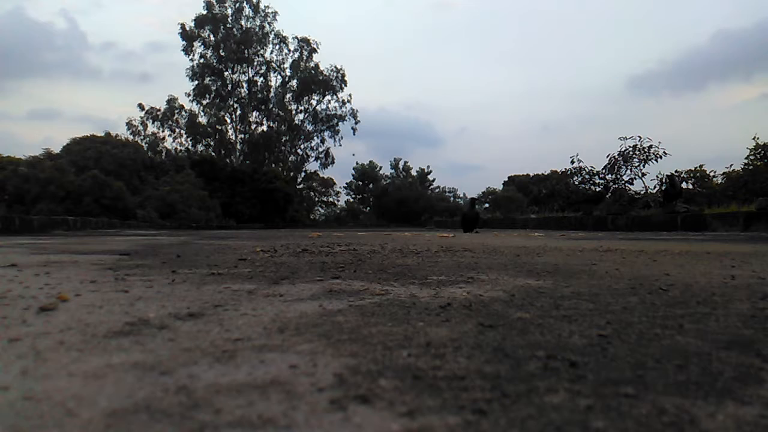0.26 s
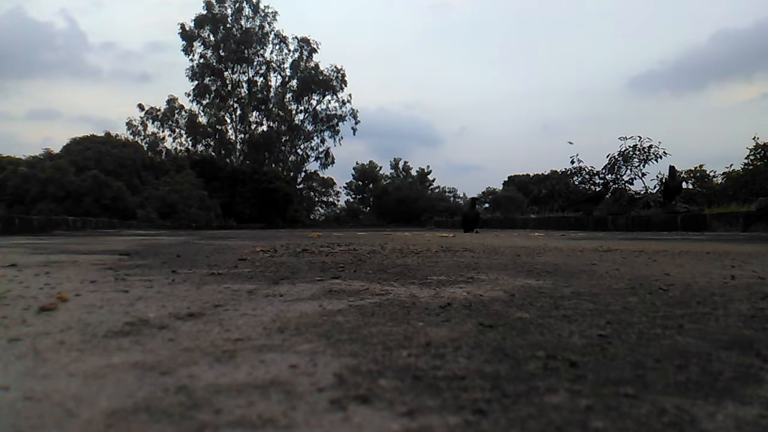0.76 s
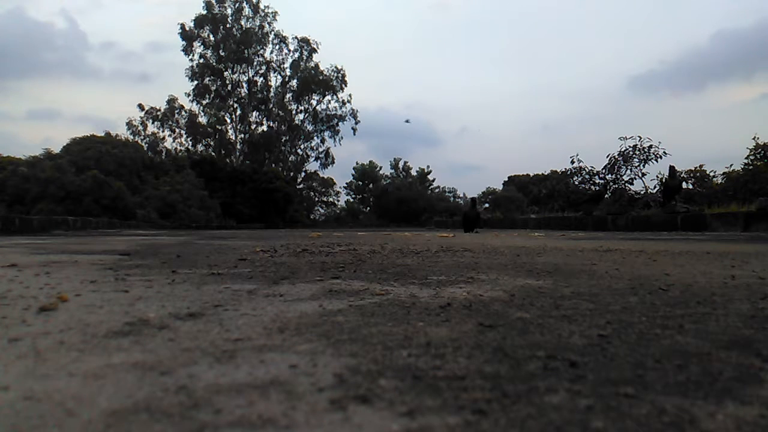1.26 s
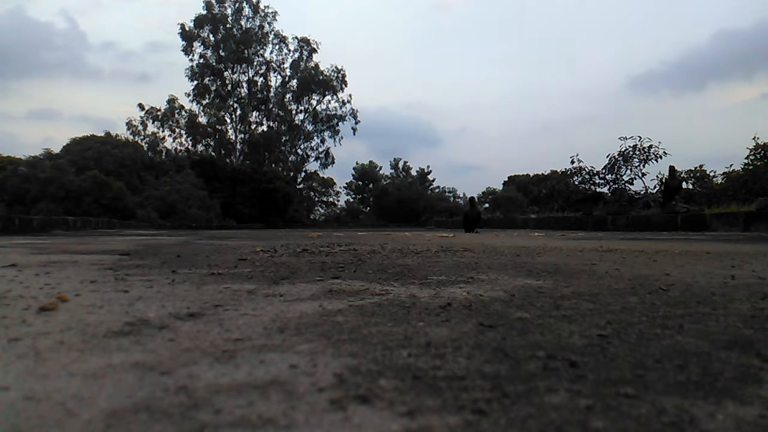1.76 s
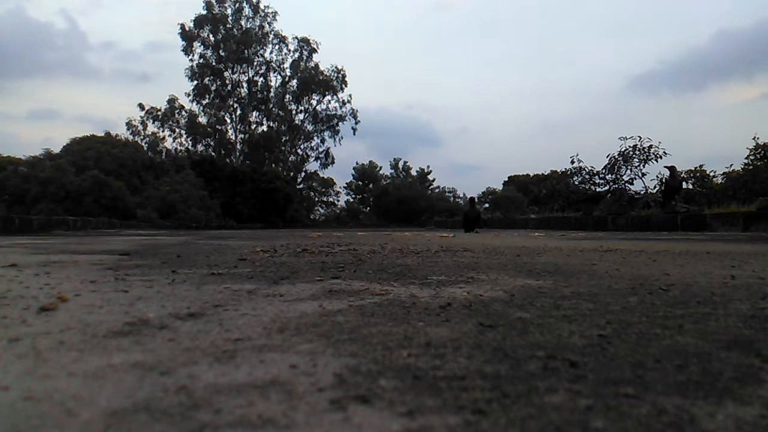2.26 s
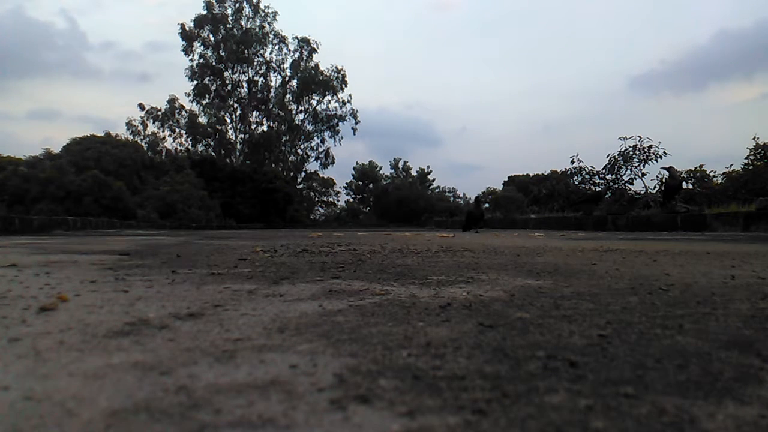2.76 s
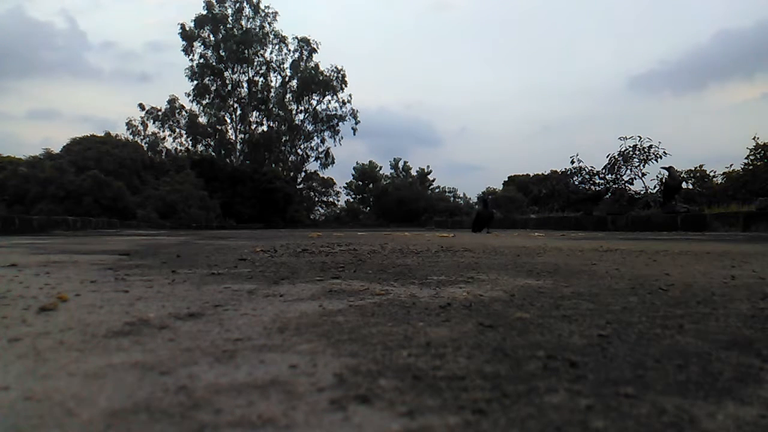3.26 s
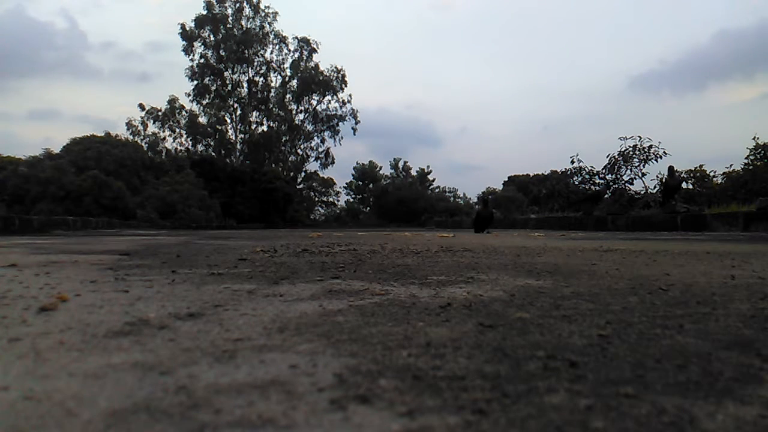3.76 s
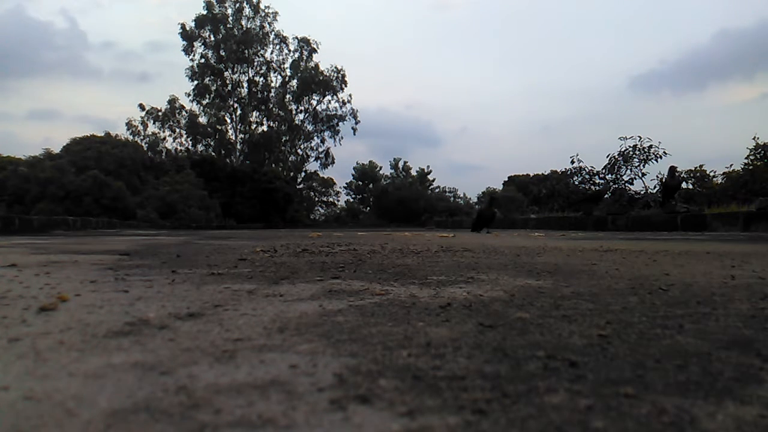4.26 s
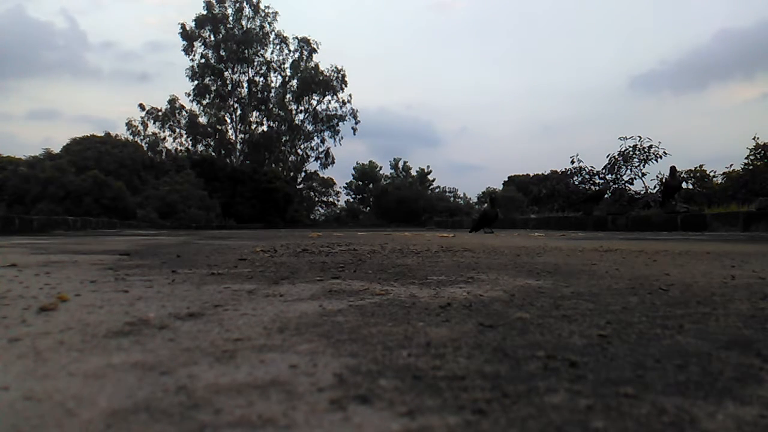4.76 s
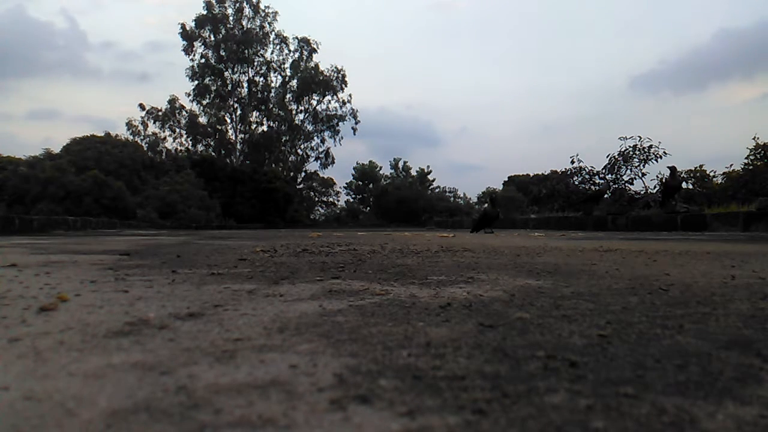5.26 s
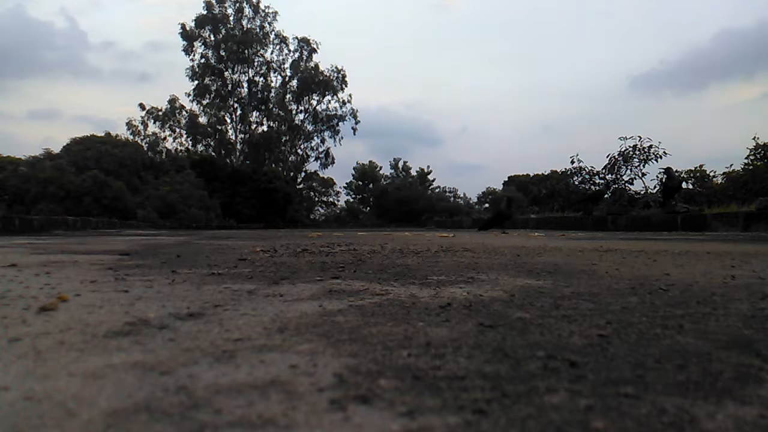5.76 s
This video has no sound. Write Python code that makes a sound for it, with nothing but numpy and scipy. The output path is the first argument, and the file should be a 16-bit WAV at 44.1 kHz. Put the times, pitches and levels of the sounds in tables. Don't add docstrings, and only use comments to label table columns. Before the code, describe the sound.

Loud rasping crow caws, then a sparse lull and more caws from other birds, over faint songbirds, distant flock chatter and breezy outdoor hush.

```python
import sys
import numpy as np
from scipy import signal
from scipy.fft import rfft, irfft, next_fast_len
from scipy.io import wavfile
from scipy.ndimage import uniform_filter1d

SR = 44100
rng = np.random.default_rng(int(sys.argv[2]) if len(sys.argv) > 2 else 0)


def magnitude_from_level(level_db):
    exponent = np.asarray(level_db, float) / 20
    return 10 ** exponent


def log_audio(samples):
    frames = np.atleast_2d(samples).T
    limited = np.clip(frames, -1, 1)
    pcm = np.round(limited * 32767).astype(np.int16)
    wavfile.write(sys.argv[1], SR, pcm)


N = 265041

# (start [s], hold [s], share of the hold where the pitch tops [0-1], top pitch [Hz], level [dB])
CAWS = [(-.245, 0.26, 0.63, 483.6, -12.5), (-.05, 0.22, 0.94, 490.4, -29.5),
        (.449, 0.27404, 0.61, 503.1, -13), (1.121, 0.2573, 0.64, 491.7, -12.5),
        (1.851, 0.31, 0.31, 513.1, -49.5), (3.69, 0.32, 0.48, 467.3, -27.5),
        (4.159, 0.36, 0.61, 508, -61.5), (4.534, 0.25245, 0.43, 453.5, -17.5), (5.3, .42, .38, 451.7, -34),
        (5.689, 0.29, .5, 504.9, -17), (2.299, 0.27, .5, 455.8, -72.5), (3.04, 0.15, .5, 470, -79.5),
        (2.64, 0.17, .5, 495, -76.5)]
CALLERS = [0, 1, 0, 0, 2, 3, 1, 4, 5, 6, 5, 5, 2]
WET_DB = [-30, -10, -6, -13, -28, -11, -24]


def crows():
    direct, by_trees = np.zeros(N), np.zeros(N)
    for (start, *shape), bird in zip(CAWS, CALLERS):
        voice = caw(shape, bird)
        add(direct, start, voice)
        add(by_trees, start, voice * magnitude_from_level(WET_DB[bird]))
    return direct + echo(by_trees, t60_s=0.2, db=0)


SCOOP_DB = [-23.5, -30, -12, -16.5, -20.5, -2, -11]


def caw(shape, bird):
    t, hz, flutter_hz, db = effort(*shape, bird)
    hz = hz * (1 - 0.2 * np.exp(-t / 0.022))
    rising = t < t[db.argmax()]
    shut = np.clip((.9 - hz / hz.max()) / .15, 0, 1)
    plain, beat, phase = folds(t, hz, flutter_hz, db, rising, bird)
    tone = pulse(t, beat, partials(hz, phase, db, rising), bird)
    voice = throat(tone, db, shut, bird)
    steady = voice / np.sqrt(uniform_filter1d(voice ** 2, size=1800) + 0.13 * np.mean(voice ** 2))
    scoop = np.cos(2 * plain) + 1.3 * np.cos(3 * plain)
    scoop = scoop * magnitude_from_level(SCOOP_DB[bird]) * shut * np.where(rising, .2, 1)
    edge = np.clip(np.minimum(t / .003, (t[-1] - t) / .035), 0, 1)
    return (steady + scoop) * magnitude_from_level(db) * edge


# (flutter [Hz], pitch lack at the start [0-1], pitch sag at the end of the hold [0-1],
# swell time [s], fade over the hold [dB])
MANNERS = [(77.79, .25, .12, 0.04766, -5.5), (72.85, 0.5, 0.95, .03, -18), (76.3, 0.9, 0.3, 0.022, -11),
           (70.13, 0.6, 0.3, 0.0511, -14.5), (75.95, 0.1, .15, 0.03283, -4), (83.66, .24, .09, 0.0501, -5),
           (81.96, 0.26, .05, 0.043, -7)]


def effort(held_s, top, top_hz, top_db, bird):
    flutter_hz, lack, sag, swell_s, fade_db = MANNERS[bird]
    release_s = .07
    t = np.arange(0, held_s + release_s + 0.12, 1 / SR)
    u = np.minimum(t / held_s, 1)
    top = min(top, .99)
    before, after = np.maximum(1 - u / top, 0), np.maximum((u - top) / (1 - top), 0)
    arch = 1 - lack * before ** 2 - sag * after ** 2
    cave = 1 - 0.5 / (1 + np.exp((held_s + 0.011 - t) / 0.0082))
    swell_db = -31 * np.exp(-t / swell_s)
    release_db = -12000 * np.maximum(t - held_s, 0) ** 2
    tired = 1 - .08 * u ** 3
    return t, top_hz * arch * cave, flutter_hz * tired, top_db + swell_db + fade_db * u ** 2 + release_db


FLUTTERS = [(0.5945, 0.062, 1.7, 0.18, 1.4), (0.64, 0.043, 1.2, 0.2, 1.5),
            (0.603, 0.1406, 0.79, 0.25, 1.02), (0.66, 0.077, 1.1, 0, 0.34), (0.59, 0.03, 2.6, 0, 0.35),
            (0.46, 0.19, 2.1, 0.16, 1.5), (0.65, 0.14, 1.2, 0.1, 1.15)]
SETTLE_S = [.03, .03, .03, .03, .04, .15, .05]
LOCKED = {4: 6}


def folds(t, hz, flutter_hz, db, rising, bird):
    swing, second, second_phase, _, _ = FLUTTERS[bird]
    jitter = .005 + .004 * np.minimum(db.max() - db, 14) * np.where(rising, 1, .2)
    jitter = jitter + .02 * (t < SETTLE_S[bird])
    beat = 2 * np.pi * np.cumsum(flutter_hz * (1 + jitter * walk(60, size=len(t)))) / SR
    plain = 2 * np.pi * np.cumsum(hz * (1 + jitter * walk(400, size=len(t)))) / SR
    if bird in LOCKED:
        beat = plain / LOCKED[bird]
    phase = plain + swing * np.sin(beat) + second * np.sin(2 * beat + second_phase)
    return plain, beat, phase


def partials(hz, phase, db, rising):
    size = len(hz)
    order = np.arange(1, 34)[:, None]
    upper = order > 6
    even = 2 * np.pi * np.cumsum(hz) / SR
    swung = even + (phase - even) * np.where(upper, .6, 1)
    scatter = 2 * np.pi * np.where(upper, .35, 1) * rng.random((33, 1))
    lines = np.cos(order * swung + scatter)
    for k in range(33):
        lines[k] *= magnitude_from_level((2.8 if k > 5 else 1.6) * walk(45, size=size))
    lines[0] *= magnitude_from_level(-28)
    opening = 1 - .94 * rising * np.clip((db.max() - db - 3) / 14, 0, 1)
    lines[4:6] *= opening
    air = 4 * high_pass(rng.standard_normal(size), 4, 3000)
    breath = .3
    high = np.sqrt(1 - breath) * lines[6:].sum(axis=0) + np.sqrt(breath) * air
    return lines[:6].sum(axis=0) + magnitude_from_level(1.2 * walk(60, size=size)) * np.sqrt(opening) * high


CATCHES = [(0.3, 4.1, 4.3), (.3, 3., 4.6), (0.2, 3., 5.05), (0.5, 2.7, 3.45), (0.8, 3., 4.03),
           (0.6, 3.8, 5.3), (0.7, 3., 4.3)]
# (depth [0-1], phase [rad], until [s])
DOUBLES = [(.6, 1., .1), (.1, 1., .1), (.1, 1., 0.11), (.2, 1., 0.062), (.2, 1., .06), (.2, 0.99, .1),
           (.45, 0.937, .13)]


def pulse(t, beat, tone, bird):
    throb, throb_phase = FLUTTERS[bird][3:]
    tone = tone * (1 + throb * np.cos(beat + throb_phase))
    depth, sharp, catch_phase = CATCHES[bird]
    tone = tone * (1 - depth * np.exp(sharp * (np.cos(beat + catch_phase) - 1)))
    twice, twice_phase, until_s = DOUBLES[bird]
    early = np.clip((until_s - t) / .03 + 1, 0, 1)
    return tone * (1 + twice * early * np.cos(2 * beat + twice_phase))


# (frequency [Hz], level per Hz [dB])
THROATS = [
    [(450, -13.5), (810, -26), (1000, -13.5), (1090, -12), (1210, -27.5), (1380, -8), (1580, -5),
     (1670, -21), (1770, 0), (1880, 0), (2060, -12), (2370, -20), (2510, -38), (2750, -30), (2990, -45)],
    [(450, -15), (810, -16.5), (1010, -15.5), (1160, -6), (2010, 5.5), (2430, -11), (2680, -32),
     (2990, -33)],
    [(450, -43.5), (810, -11), (1030, -6), (1260, -9), (1540, 4.5), (1740, -6.5), (1990, 2.5), (2990, -29)],
    [(450, -24), (810, -22.5), (920, -14.5), (1070, -15), (1380, -10), (1550, -22.5), (1750, -2.5),
     (1930, 4), (2080, -6.5), (2200, -4.5), (2990, -34)],
]
# (frequency [Hz], level per Hz [dB])
MORE_THROATS = [
    [(450, -54), (810, -15.5), (900, -12), (1110, -17.5), (1260, -8.5), (1570, -6), (1860, 3.5),
     (2070, -12), (2350, -13.5), (2590, -34), (2840, -32), (2990, -43)],
    [(450, -55), (810, -17.5), (920, -13.5), (1090, -18), (1400, 1), (1660, -6), (1870, 2), (2220, -6.5),
     (2420, -6), (2720, -33.5), (2990, -40.5)],
    [(450, -29), (810, -12), (960, -19), (1200, -21), (1340, -1.5), (1420, -12.5), (1530, 1), (1670, -17.5),
     (1760, 2), (1850, 0), (2080, -17), (2350, -20), (2520, -38), (2750, -30), (2990, -61)],
]
# (frequency [Hz], level per Hz [dB])
RASPS = [
    [(3250, -27.5), (3500, -45), (3700, -29), (3900, -42.5), (4180, -25), (4340, -33.5), (4520, -26),
     (4820, -43), (4990, -37), (5300, -48), (5580, -40.5), (5900, -54.5), (6060, -47.5), (6280, -54)],
    [(3210, -34.5), (6490, -37.5)],
    [(3210, -15), (6490, -68)],
    [(3210, -67), (3600, -51), (4600, -42.5), (4900, -30.5), (5050, -35.5), (5220, -24.5), (5420, -42.5),
     (5820, -50.5), (6490, -52.5)],
    [(3210, -40), (3740, -54.5), (4000, -53), (4270, -36), (4500, -43.5), (4650, -44), (5200, -45.5),
     (5600, -44), (5950, -53), (6510, -56.5)],
    [(3210, -48.5), (3700, -37.5), (6490, -45.5)],
    [(3300, -42), (3520, -45.5), (3700, -38.5), (3900, -45), (4140, -35), (4320, -38), (4560, -22.5),
     (4800, -39.5), (4970, -30.5), (5200, -42), (5500, -40), (6200, -56.5), (6510, -59)],
]
# (frequency [Hz], level per Hz [dB])
SHEENS = [
    [(6480, -42.5), (6680, -50), (6920, -35.5), (7200, -43), (9000, -50), (11130, -54), (12230, -64.5),
     (14000, -63)],
    [],
    [],
    [],
    [(7980, -47), (8610, -42), (12490, -58.5), (14000, -62.5)],
    [],
    [(7100, -49.5), (7930, -46.5), (9310, -59), (12930, -64.5), (14000, -69.5)],
]


def throat(tone, db, shut, bird):
    voice = colour(tone, (THROATS + MORE_THROATS)[bird] + RASPS[bird] + SHEENS[bird])
    top = signal.sosfiltfilt(signal.butter(2, 5000, "high", fs=SR, output="sos"), voice)
    return voice - top * (1 - magnitude_from_level(.5 * (db - db.max()) - 8 * shut))


# (frequency [Hz], level per Hz [dB])
TAP = [(710, 0.5), (1660, -22.5), (2570, -7), (3480, -25.5), (4530, -7.5), (5960, -28.5), (7060, -19),
       (12870, -47), (14000, -48.5)]


def tap():
    start_s, level_db, t60_s, rise_s = 4.422, -41, 0.12, .003
    out, t = np.zeros(N), np.arange(SR // 5) / SR
    fade = np.minimum(t / rise_s, 1) * np.exp(-np.log(1000) * t / t60_s)
    add(out, start_s, magnitude_from_level(level_db) * unit(colour(rng.standard_normal(len(t)), TAP)) * fade)
    return out


# (frequency [Hz], level [dB])
LATE_COLOUR = [(800, -8), (1500, -8), (1850, -0.5), (3000, 4), (14000, 4)]


def tree_line(near):
    early = echo(near, t60_s=0.22, db=-24)
    late = echo(colour(near, LATE_COLOUR), t60_s=.65, db=-31, rise_s=.08)
    return early + late


def echo(x, t60_s, db, rise_s=0.034):
    t = np.arange(SR) / SR
    tail = rng.standard_normal(SR) * np.exp(-np.log(1000) * t / t60_s) * np.clip(t / rise_s, 0, 1)
    tail = tail / np.sqrt(np.sum(tail ** 2))
    tail = tail + magnitude_from_level(6) * high_pass(tail, 3, 4500)
    return magnitude_from_level(db) * signal.fftconvolve(x, tail)[:N]


# (start [s], length [s], from [Hz], to [Hz], level [dB])
WHISTLES = [(0.121, 0.085, 2096, 2430, -45.5), (0.369, 0.048, 2900, 3000, -66),
            (0.792, .031, 2400, 2400, -61), (1.448, 0.11, 3745, 3745, -62.5),
            (3.493, 0.089, 2310, 2430, -72), (3.494, 0.06, 1146, 1240, -70),
            (3.553, 0.034, 3000, 3680, -77), (3.586, 0.12, 2610, 2720, -73),
            (5.007, 0.017, 2880, 2830, -60.5), (5.264, 0.04, 1655, 1610, -57),
            (2.07, 0.037, 2400, 2930, -73), (0.24, .045, 2980, 3020, -76), (0.885, .045, 2830, 3020, -64),
            (1.013, 0.057, 2870, 2820, -70), (1.064, 0.026, 2310, 2280, -65),
            (1.109, 0.035, 3750, 3770, -66.5), (2.48, .02, 2485, 2440, -70),
            (3.196, 0.046, 2285, 2890, -73), (4.075, .025, 2900, 3150, -67), (4.875, .04, 2600, 2630, -69),
            (5.54, 0.061, 4520, 4030, -72), (5.562, 0.033, 3010, 3200, -68), (.392, .058, 3900, 2850, -65),
            (.82, .068, 4650, 3300, -73), (.785, .045, 2550, 2950, -69), (.83, .2, 2830, 2870, -73),
            (5.155, .08, 1640, 1620, -64), (2.66, .09, 2080, 1950, -72), (2.99, .03, 2500, 2250, -73),
            (2.14, .06, 1900, 2350, -72)]
# (start [s], length [s], from [Hz], to [Hz], level [dB])
COOS = [(0.141, 0.0089, 567, 517, -45), (0.309, 0.0351, 641.5, 467, -48), (0.747, 0.083, 625, 664, -51.5),
        (0.857, 0.0608, 593.5, 528, -50.5), (1.03, 0.063, 552.7, 489, -59), (1.25, 0.088, 510.5, 488, -51),
        (1.432, 0.0323, 588.3, 404.4, -45), (1.594, 0.086, 642, 587.4, -57.5),
        (1.597, 0.1096, 470.9, 424, -59.5), (1.82, 0.0485, 543.2, 503, -56), (1.987, 0.05, 588, 554.5, -53),
        (2.165, 0.0935, 711, 511.1, -56.5), (1.609, 0.088, 825.3, 731, -61),
        (2.202, 0.0536, 354.7, 358.7, -51.5), (2.362, 0.045, 764, 863.6, -62.5)]
# (start [s], length [s], from [Hz], level [dB])
CHIRPS = [(2.049, 0.16, 5000, -77), (2.412, .05, 3450, -70), (4.095, 0.043, 4420, -67),
          (4.125, 0.045, 3600, -72), (4.287, .035, 4200, -69), (5.597, 0.03, 3550, -67)]
# (start [s], length [s], from [Hz], level [dB])
SLIDES = [(.15, 0.034, 3020, -73), (.299, 0.02, 3090, -61), (.388, 0.015, 3880, -72),
          (1.788, 0.054, 2400, -64), (4.245, .048, 4520, -69.5), (5.05, 0.068, 2740, -67),
          (5.333, 0.063, 4420, -68), (5.417, 0.047, 4550, -76)]


def birds():
    out = phrases() + twitter()
    calls = WHISTLES + COOS
    for rows, fall in ((CHIRPS, .81), (SLIDES, .92)):
        calls = calls + [(s, length, hz, hz * fall, db) for s, length, hz, db in rows]
    for start, length, from_hz, to_hz, db in calls:
        size = int(length * SR)
        call = whistle(np.linspace(from_hz, to_hz, size), db, wobble=2.5)
        add(out, start, call * np.hanning(size) ** .5)
    return out + echo(out, t60_s=.22, db=-8)


# (time from the top [s], pitch [Hz], level [dB])
PHRASE = [(-.13, 2223, -11), (-.095, 2451, -9.5), (-.06, 2740, -9.5), (-.045, 2838, -9), (-.03, 3120, -0.5),
          (-.004, 3580, 2.5), (.004, 3670, 5), (0.012, 3705, -26)]
# (time of the top [s], level [dB])
PHRASES = [(1.636, -61), (1.977, -62), (2.302, -63.5), (2.64, -64), (2.979, -64.5), (3.303, -67)]


def phrases():
    out = np.zeros(N)
    s, hz, db = np.transpose(PHRASE)
    t = np.arange(s[0], s[-1], 1 / SR)
    for top_s, top_db in PHRASES:
        bend = 1 + .008 * walk(25, size=len(t))
        song = whistle(bend * np.interp(t, s, hz), np.interp(t, s, db) + top_db, wobble=3.2)
        add(out, top_s + s[0], song)
        add(out, top_s + s[0], echo(song, t60_s=0.35, db=6.5, rise_s=0.012))
    return out


# (start [s], length [s], low [Hz], high [Hz], level [dB])
TWITTERS = [(5.04, .2, 2800, 4400, -78), (5.1, .11, 2900, 3500, -79), (5.41, .09, 4500, 5000, -84),
            (.2, 0.2, 2700, 3800, -80), (3.21, 0.11, 2600, 3100, -77), (.82, .2, 2600, 3600, -83)]


def twitter():
    out = np.zeros(N)
    for start, length, low_hz, high_hz, db in TWITTERS:
        for when, pitch, size in rng.random((60, 3)):
            hz = (low_hz + pitch * (high_hz - low_hz)) * np.linspace(1.015, .985, 900)
            cheep = whistle(hz, db + 4 * size, wobble=.8) * np.hanning(900)
            add(out, start + when * length, cheep)
    return out


def whistle(hz, db, wobble):
    size = len(hz)
    waver = magnitude_from_level(wobble * walk(68, size=size)) * (1 + .12 * wobble * walk(300, size=size))
    hz = hz * (1 + .007 * walk(150, size=size))
    return np.sqrt(2) * magnitude_from_level(db) * waver * np.sin(2 * np.pi * np.cumsum(hz) / SR)


# (time [s], level [dB])
CHATTER = [(0, -52), (.3, -59.5), (.45, -59.5), (1.0, -63), (1.499, -62), (2.2, -72.5), (2.8, -73),
           (3.401, -73), (3.601, -64.5), (4.1, -60.5), (4.35, -63), (4.5, -58), (4.95, -62.5), (5.15, -65),
           (5.299, -69), (6.01, -50)]


def chatter():
    s, db = np.transpose(CHATTER)
    # (centre [Hz], width [Hz], level [dB])
    bands = [(619, 150, 4.0), (940, 420, -9.0), (1390, 1100, 4.5), (1950, 1500, -15.5),
             (2500, 280, -14.5), (3300, 760, -22)]
    flock = sum(band(hz, width) * magnitude_from_level(band_db + 2.3 * walk(14)) for hz, width, band_db in bands)
    flock = signal.sosfilt(signal.butter(2, 4200, fs=SR, output="sos"), flock)
    return unit(flock) * magnitude_from_level(np.interp(np.arange(N) / SR, s, db))


# (time [s], strength [dB])
GUST = [(0, 1), (.4, -1.5), (.7, -2), (1.1, -1), (1.6, -4.5), (2.1, -1), (2.6, 1.5), (3.1, 4.5), (3.6, 6.5),
        (4.1, 7), (4.6, 8), (4.88, 8.5), (5.05, 5), (5.35, -2.5), (5.8, -2), (6.01, 4.5)]
# (time [s], half length [s], level [dB])
PUFFS = [(0.289, 0.011, 8.5), (0.634, 0.069, -3.5), (0.863, 0.0656, -7.5), (0.96, 0.0225, 13),
         (1.237, 0.0162, 8.5), (1.315, 0.0176, -7), (1.454, 0.3, 3), (1.982, 0.0273, 7.5),
         (2.225, 0.041, 7), (2.532, 0.029, 3.5), (2.878, 0.051, -5), (2.952, 0.01105, 10),
         (3.078, 0.032, -4.5), (3.121, 0.023, 9), (3.472, 0.03, 5.5), (3.761, 0.061, 8.5),
         (3.916, 0.048, -0.5), (4.346, 0.296, 6), (4.802, 0.0486, 5), (4.915, 0.11, -5), (5.17, 0.73, 6),
         (5.545, 0.24, -0.5), (5.886, 0.067, -4.5)]
# (frequency [Hz], level per Hz [dB])
RUMBLE = [(12, -62), (20, -37.5), (52, -5.5), (75, 0.5), (134, 2), (178, -5.5), (221, -17.5), (240, -11.5),
          (310, -33.5), (530, -120)]


def wind():
    t = np.arange(N) / SR
    gust = np.interp(t, *np.transpose(GUST))
    puffs = sum(db * np.exp(-((t - s) / half) ** 2) for s, half, db in PUFFS)
    rumble = unit(colour(rng.standard_normal(N) * magnitude_from_level(0.98 * walk(30)), RUMBLE))
    roar_shape = [(210, -2.5), (300, 6.0), (420, 3.0), (520, -10.0)]  # (frequency [Hz], level [dB])
    roar = unit(colour(rng.standard_normal(N) * magnitude_from_level(1.4 * walk(14)), roar_shape))
    return rumble * magnitude_from_level(-43.5 + 0.52 * gust + puffs) + roar * magnitude_from_level(-61 + 1.9 * gust + 0.1 * puffs)


# (frequency [Hz], level per Hz [dB])
YARD = [(450, -10), (1150, -24), (1920, -27.5), (2930, -31.5), (3670, -37.5), (4680, -38), (6280, -41),
        (8560, -49), (9220, -36.5), (13950, -41), (14300, -49)]


def yard():
    octaves = 450 * 2. ** np.arange(6)
    leaves = sum(band(hz, hz * 0.34) * np.sqrt(hz) * magnitude_from_level(2.4 * walk(4.5)) for hz in octaves)
    return magnitude_from_level(-63.5) * unit(colour(leaves, YARD)) + crickets()


# (pitch [Hz], width [Hz], level [dB])
CRICKETS = [(3745, 63, -77.5), (8350, 500, -84)]
# (time [s], level [dB])
CRICKET_SWELL = [(0, -12.5), (1.299, -1.5), (1.6, 1.47), (3.3, -5), (3.8, -6), (6.01, -6.5)]


def crickets():
    swell = np.interp(np.arange(N) / SR, *np.transpose(CRICKET_SWELL))
    return sum(band(hz, width) * magnitude_from_level(db + 2.1 * walk(9.0) + swell * (hz < 5000))
               for hz, width, db in CRICKETS)


def colour(x, points):
    hz, db = np.transpose(points)
    size = next_fast_len(len(x) + 4096)
    f = np.log(np.arange(size // 2 + 1) * SR / size + 1)
    slope = 40 * (np.maximum(np.log(hz[0]) - f, 0) + np.maximum(f - np.log(hz[-1]), 0))
    return irfft(rfft(x, size) * magnitude_from_level(np.interp(f, np.log(hz), db) - slope), size)[:len(x)]


def high_pass(x, order, hz):
    return signal.sosfilt(signal.butter(order, hz, "high", fs=SR, output="sos"), x)


def unit(x):
    return x / np.sqrt(np.mean(x ** 2))


def walk(rate, size=N):
    k = int(SR / rate)
    held = np.repeat(rng.standard_normal(size // k + 1), k)
    return unit(uniform_filter1d(uniform_filter1d(held, k), k)[:size])


def band(hz, width):
    return unit(signal.lfilter(*signal.iirpeak(hz, hz / width, SR), rng.standard_normal(N)))


def add(out, s, x):
    i = int(s * SR)
    x = x[max(-i, 0):N - i]
    out[max(i, 0):max(i, 0) + len(x)] += x


def scene():
    near = crows() + tap()
    return (near + tree_line(near) + birds() + chatter() + wind() + yard())[None]


def low_pass(x):
    return signal.sosfilt(signal.butter(12, 14280, fs=SR, output="sos"), x)


def record(dry):
    return low_pass(dry)


dry = scene()
out = record(dry)
log_audio(out)
```